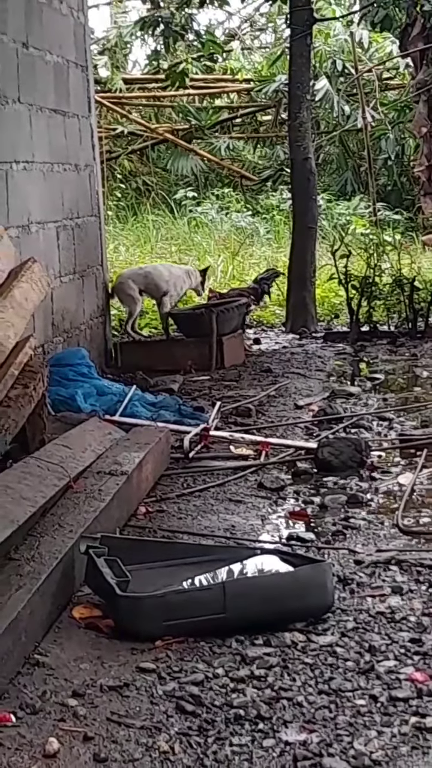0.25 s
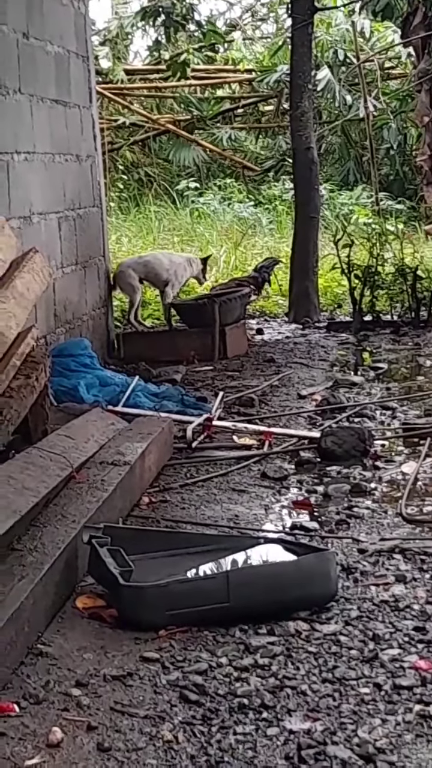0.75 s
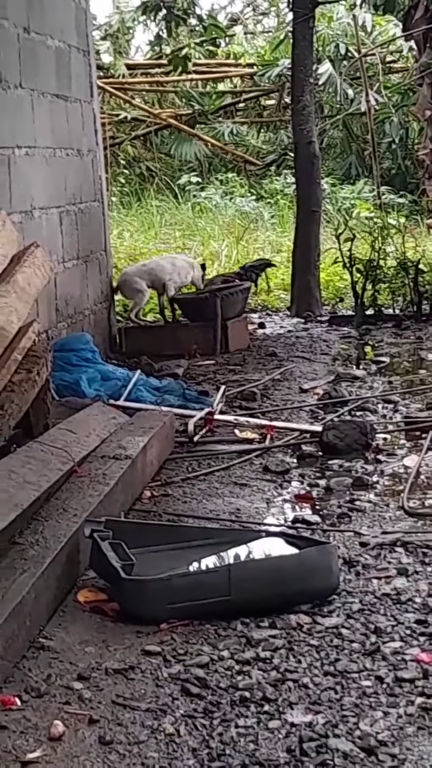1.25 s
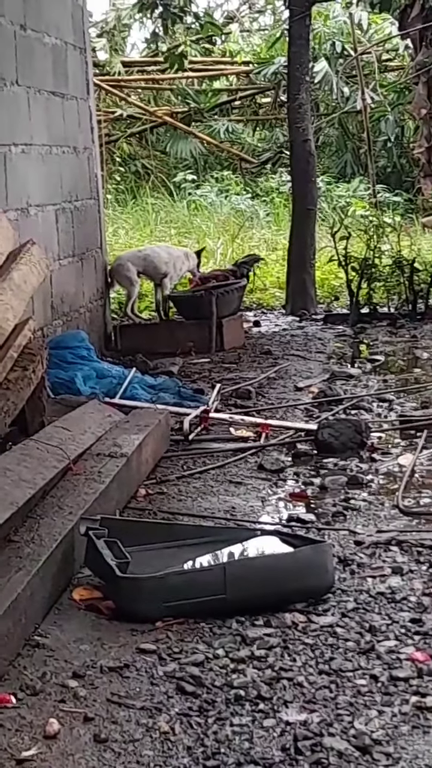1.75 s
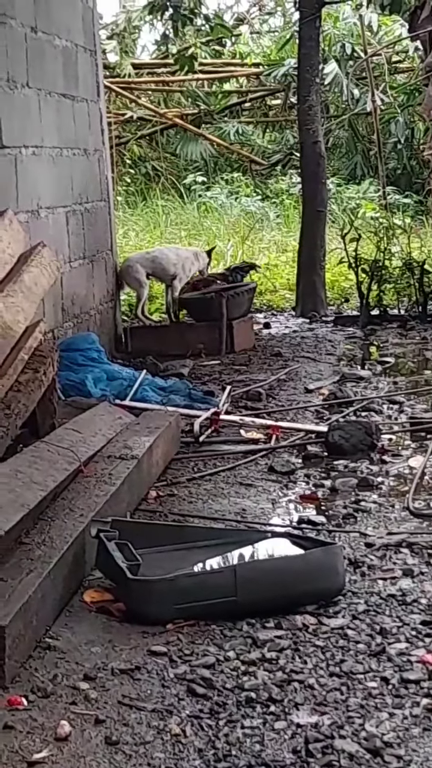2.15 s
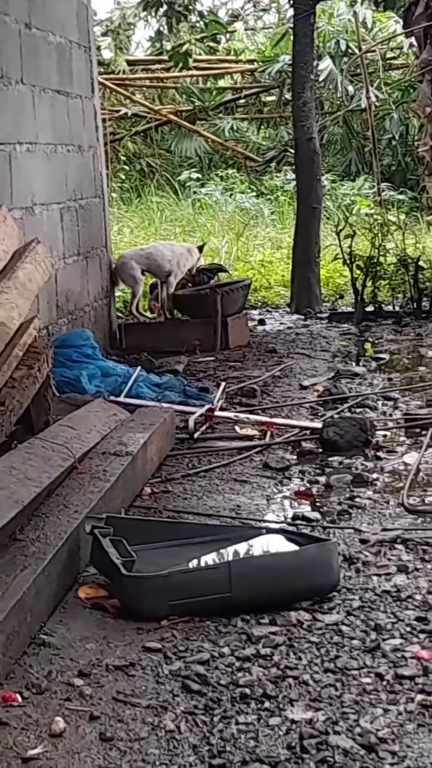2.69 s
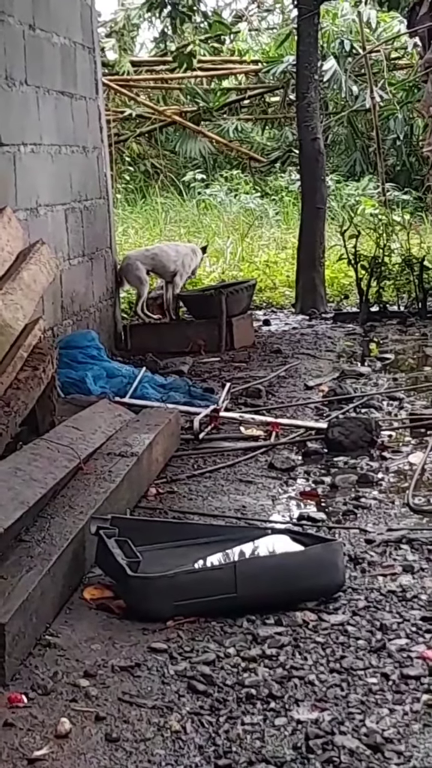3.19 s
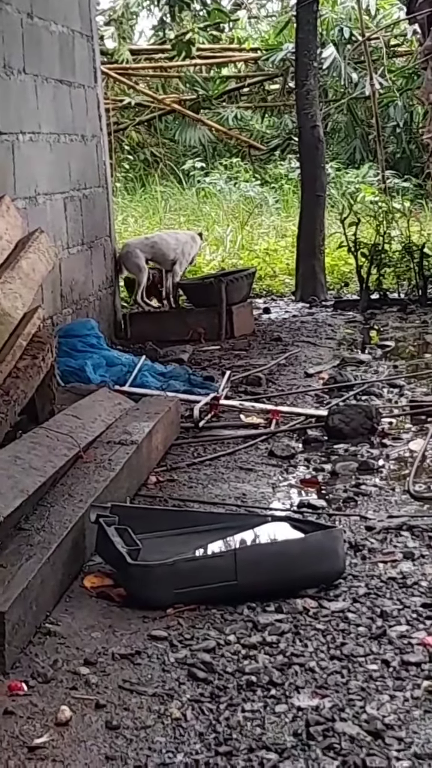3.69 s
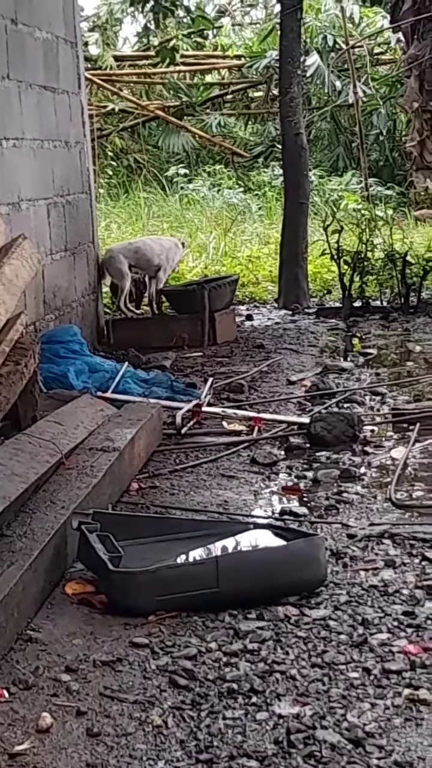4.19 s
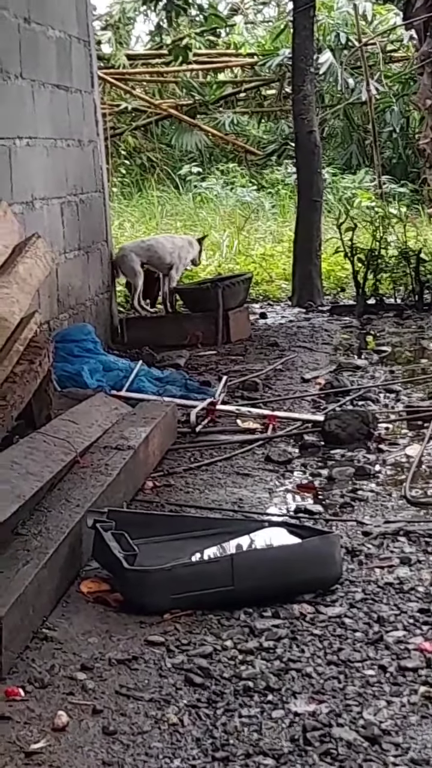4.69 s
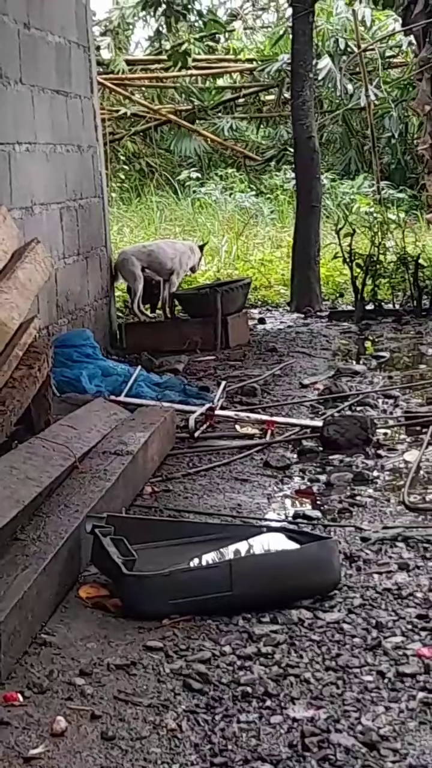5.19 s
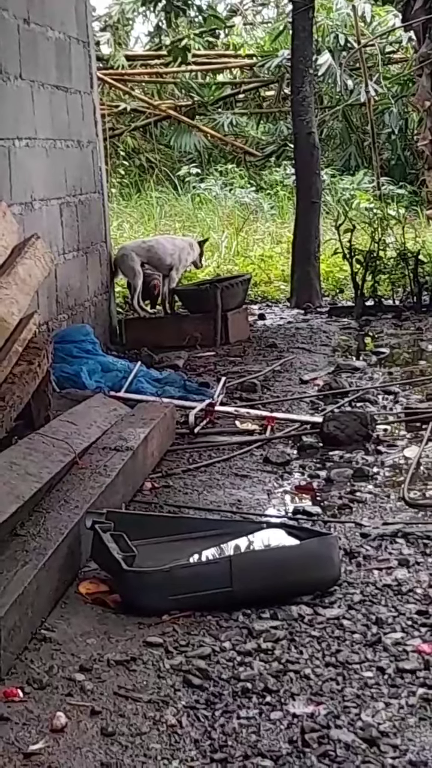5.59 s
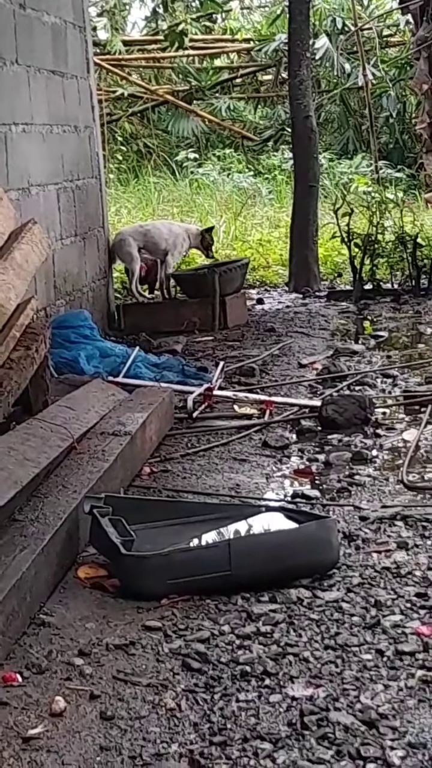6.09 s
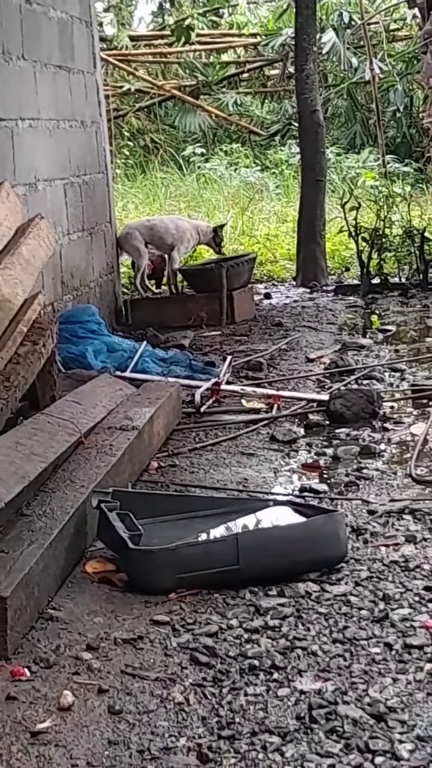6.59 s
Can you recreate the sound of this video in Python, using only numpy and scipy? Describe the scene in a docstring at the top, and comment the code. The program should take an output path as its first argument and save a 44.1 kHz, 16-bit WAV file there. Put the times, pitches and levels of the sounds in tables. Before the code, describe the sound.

A handheld microphone a few metres off catches a dog guarding its food: two sharp echoing barks, three long throaty growls, one gruff woof and a barely audible final yip. Buzzy chirps, thin chips and falling whistles come from bushes nearby, with more birds farther away. A dove repeats a quick fluttery coo, water ticks on the ground, and a far low drone swells softly beneath the hiss.

```python
"""Small dog guarding its food in a wet yard

Beside a block wall the dog gives two sharp barks, a gruff woof, three long growls and a faint yip:
rough vocal folds drive gliding throat and mouth resonances, and echoes and a diffuse tail answer.
Small birds chirp and peep and a dove coos its phrase three times, all gliding sines; a few drips tick in noise.
Filtered noise makes the far low drone, the air of the yard and the hiss of the microphone."""
import sys
import numpy as np
from scipy import signal
from scipy.fft import rfft, irfft, next_fast_len
from scipy.io import wavfile
from scipy.ndimage import uniform_filter1d

SR = 44100
rng = np.random.default_rng(int(sys.argv[2]) if len(sys.argv) > 2 else 0)


def store_wav(level_fs):
    """Save 16-bit WAV to argv[1]."""
    pcm = np.round(np.clip(np.atleast_2d(level_fs), -1, 1) * 32767)
    wavfile.write(sys.argv[1], SR, pcm.T.astype(np.int16))


N = 302073

# likeness of left and right in diffuse sound: pitch_hz, likeness (0 unrelated, 1 identical)
STEREO_LIKENESS = [(30, .85), (150, .95), (450, .92), (750, .85), (1000, .25), (3000, 0)]


def amp(db):
    """Turns decibels into a linear gain."""
    return 10 ** (np.asarray(db) / 20)


def evened(x):
    """Scales to rms 1."""
    return x / np.sqrt(np.mean(x ** 2) + 1e-20)


def steadied(x, size):
    """Holds the rms near 1 over stretches of size samples."""
    return x / np.sqrt(abs(uniform_filter1d(x ** 2, size)) + 1e-12)


def read(points, hz):
    """Reads a table on a log-frequency axis."""
    table_hz, value = np.transpose(points)
    return np.interp(np.log(hz + 1), np.log(table_hz + 1), value)


def follow(rows, t):
    """Gives every column of a curve table at the times t."""
    s, *columns = np.transpose(rows)
    return [np.interp(t, s, c) for c in columns]


def ramp(x, span):
    """Rises from 0 to 1 as x goes from 0 to span."""
    return np.clip(x / span, 0, 1)


def add(mix, start_s, sound):
    """Mixes a sound in at its start time, cut off where the mix ends."""
    part = mix[max(round(start_s * SR), 0):][:len(sound)]
    part += sound[:len(part)]


def tone(hz):
    """A sine that follows the pitch curve hz."""
    return np.sin(2 * np.pi * np.cumsum(hz) / SR)


def colour(x, points):
    """Filters by a table of pitch_hz, gain_db."""
    size = next_fast_len(x.shape[-1] + 4096)
    gain = amp(read(points, np.fft.rfftfreq(size, 1 / SR)))
    return irfft(rfft(x, size) * gain, size)[..., :x.shape[-1]]


def wander(size, rate_hz):
    """Smooth random drift of rms 1, with changes up to about rate_hz."""
    span = 2 ** 19 if size > 2 ** 17 else 2 ** 17
    hz = np.fft.rfftfreq(span, 1 / SR)
    return evened(irfft(rfft(rng.standard_normal(span)) / (1 + (hz / rate_hz) ** 4)))[:size]


def resonate(x, hz, width):
    """A resonance of gain 1, width in Hz, that follows the curve hz."""
    turn = np.exp(2j * np.pi * np.cumsum(hz * np.ones(len(x))) / SR)
    r = np.exp(-np.pi * width / SR)
    # shift the resonance down to zero, smooth there, and shift back
    return 2 * (turn * signal.lfilter([1 - r], [1, -r], x / turn)).real


def folds(hz, rough, jitter, jitter_hz, shimmer_db, hoarse, count):
    """Vocal folds: soft-edged pulses of uneven spacing and strength, with a puff of turbulence in each cycle."""
    size, rough = len(hz), np.clip(rough, 0, 1)
    turns = np.cumsum(hz * (1 + jitter * rough * wander(size, jitter_hz))) / SR
    harmonics = (np.cos(2 * np.pi * k * turns + k * k / count) for k in range(1, count + 1))
    pulses = sum(harmonics) * np.sqrt(4 * hz / SR)
    puffs = evened((.5 + np.exp(-(turns % 1) / .3)) * rng.standard_normal(size))
    shimmer = amp(shimmer_db * rough * wander(size, 100))
    return ((1 - rough) * pulses + hoarse * rough * puffs) * shimmer


def yard(x, wet_db, wall_db, left_db):
    """Direct sound, echoes from wall and ground, and a diffuse tail that each band loses at its own speed."""
    # decay of the tail: pitch_hz, t60_s
    decay = [(150, 0.89), (500, 0.37), (900, 0.36), (1250, 0.77), (1600, 0.66), (2200, 0.82), (3000, 0.63),
             (6000, 0.63), (12000, 0.071)]
    # early echoes: left_delay_s, right_delay_s, level_db before wall_db is added
    echoes = [(.0094, 0.0095, -7.5), (.0172, 0.021, -3.5), (.027, 0.021, -22.5), (0.06, 0.038, -8)]
    # sparse random reflections
    taps = rng.choice([-1., 1.], (2, SR)) * (rng.random((2, SR)) < 1 / 10)
    hz, t, bands = signal.stft(taps, SR, nperseg=256)
    same = np.clip(read(STEREO_LIKENESS, hz), -1, 1)[:, None]
    bands[1] = same * bands[0] + np.sqrt(1 - same ** 2) * bands[1]
    fade = amp(-60 * t / read(decay, hz)[:, None])
    build_up = 1 - np.exp(-t / 0.0039)
    tail = signal.istft(bands * fade * build_up, SR, nperseg=256)[1]
    response = amp(wet_db) * tail / np.linalg.norm(tail[0])
    response[:, 0] += 1  # direct sound
    for left_s, right_s, db in echoes:
        response[[0, 1], [round(left_s * SR), round(right_s * SR)]] += amp(db + wall_db)
    balance = amp([[left_db / 2], [-left_db / 2]])
    return signal.fftconvolve(x[None], response, axes=1)[:, :len(x)] * balance


def buzz(length, start_hz, end_hz):
    """A gliding note; a fast flutter of the pitch makes it buzz."""
    t = np.arange(0, length, 1 / SR)
    flutter = np.sin(2 * np.pi * (rng.uniform(70, 130) * t + rng.random()))
    hz = start_hz + (end_hz - start_hz) * t / length + 260 * flutter
    return evened(tone(hz) * (1 + 0.14 * flutter) * signal.windows.tukey(len(t), .5))


def whistle(length, start_hz, end_hz):
    """A clear gliding note with a slight quaver."""
    u = np.arange(0, length, 1 / SR) / length
    quaver = np.interp(u, np.linspace(0, 1, 24), rng.standard_normal(24))
    hz = start_hz + (end_hz - start_hz) * u + 70 * quaver
    return evened(tone(hz) * signal.windows.tukey(len(u), .4))


def background():
    """Noise for outdoor air, alike in both ears in the bass; a narrow noise band for the drone; and mic hiss."""
    # outdoor air, relative spectrum: pitch_hz, density_db (dB per Hz)
    air_colour = [(20, -33), (33, -23), (48, -5), (68, 0), (100, -3), (140, -8), (200, -21), (300, -21),
                  (500, -31), (1000, -37.5), (2000, -40), (4000, -30), (7000, -28)]
    # microphone hiss, relative spectrum: pitch_hz, density_db (dB per Hz)
    hiss_colour = [(4120, -14.5), (7000, -9), (7630, -7.5), (8050, -15), (8460, -18), (9860, 3.5),
                   (10500, 9), (11100, 3.5), (12200, -27), (12900, -46.5), (14500, -37.5), (15500, -37.5)]
    # swell of the drone: time_s, level_db before its trim
    drone_swell = [(0, -48.5), (1.5, -51.5), (2.7, -47), (3.5, -60), (4.9, -69.5), (5.65, -44), (5.95, -60),
                   (6.85, -75)]
    air_db, hiss_db, drone_trim_db = -57.5, -53.5, -8
    balance = amp([[-.6], [.6]])  # leans right

    a, b = rng.standard_normal((2, N))
    same = np.clip(read(STEREO_LIKENESS, np.fft.rfftfreq(N, 1 / SR)), -1, 1)
    right = irfft(same * rfft(a) + np.sqrt(1 - same ** 2) * rfft(b), N)
    air = amp(air_db + wander(N, 1.9)) * evened(colour(np.array([a, right]), air_colour)) * balance

    hum = resonate(resonate(rng.standard_normal(N), 93, 12), 93, 24)
    drone_db = follow(drone_swell, np.arange(N) / SR)[0] + drone_trim_db
    drone = amp(drone_db) * steadied(hum, size=14000)

    hiss = amp(hiss_db) * evened(colour(rng.standard_normal((2, N)), hiss_colour)) * balance
    return air + drone + hiss


def far_flock(count=180):
    """More birds further off: short falling peeps at random moments, mostly heard as echo."""
    # swell of the far peeping: time_s, level_db
    flock_swell = [(0, -70), (1.8, -77), (3.2, -60), (4.3, -64), (5.2, -61.5), (6, -65), (6.85, -62)]
    out = np.zeros(N)
    for when, pitch, span, fall in rng.random((count, 4)):
        u = np.arange(0, 1, 1 / (SR * (.04 + .07 * span)))
        hz = (3800 + 2200 * pitch) * (1 - (0.03 + 0.32 * fall) * u)
        add(out, when * N / SR, tone(hz) * np.sin(np.pi * u))
    level = amp(follow(flock_swell, np.arange(N) / SR)[0])
    return level * evened(yard(out, wet_db=3.5, wall_db=-11.5, left_db=-2.5))


def barks():
    """A hard, harsh burst: the mouth resonance rises as the jaw opens and sinks with the pitch as it shuts."""
    # the first bark is already under way, the last is a faint yip: start_s, length_s, effort_db, top_pitch_hz,
    # widest_mouth_hz, bite_db (level of the upper voice), roughness (0-1, before the end adds more)
    bark_rows = [(-.083, 0.17, -21, 315, 932, -12.5, 0.25), (1.261, .17, -18.5, 343.3, 1048, -16.5, .27),
                 (6.474, 0.11, -65.5, 314.2, 760, -19, 0.65)]
    # colour of the throat: pitch_hz, gain_db
    throat = [(150, -22), (400, -17), (560, -17.5), (740, -0.5), (1100, -3), (1330, -9), (1570, 5.5),
              (1750, 3), (2200, -6), (2650, -4), (3030, 2.5), (3500, -5), (4400, -8.5), (5500, -13.5),
              (9000, -22.5), (12000, -4), (15000, -27.5)]
    attack_s, attack_db = .021, 25.5  # the voice swells by this much
    hold, swell_db, release_db = .5, 6, 25.5  # share of the length; growth up to there; fade after it
    jaw_open_at = .2  # share of the length at which pitch and mouth peak
    pitch_start, pitch_end, pitch_lag = .84, .5, 1.2  # shares of the top pitch; late fall, as a power of time
    mouth_start, mouth_end, mouth_lag = .72, .48, 1.37  # shares of the widest resonance; the jaw shuts late
    bite_rise_s, bite_rise_db = .038, 23  # the upper voice comes in after the core
    end_rough = .35  # extra roughness as the voice gives out

    out = np.zeros(SR + N)  # begins one second early
    for start, length, peak_db, top_hz, widest_hz, bite_db, roughness in bark_rows:
        t = np.arange(0, length, 1 / SR)
        u = t / length
        unopened = 1 - ramp(u, jaw_open_at)
        shut = ramp(u - jaw_open_at, 1 - jaw_open_at)
        release = ramp(u - hold, 1 - hold)
        hz = top_hz * pitch_start ** unopened * pitch_end ** (shut ** pitch_lag)
        mouth_hz = widest_hz * mouth_start ** unopened * mouth_end ** (shut ** mouth_lag)
        effort_db = peak_db - attack_db * (1 - ramp(t, attack_s))
        effort_db = effort_db - swell_db * (1 - ramp(u, hold)) - release_db * release
        upper_db = bite_db - bite_rise_db * (1 - ramp(t, bite_rise_s))
        rough = roughness + end_rough * release ** 2
        source = folds(hz, rough, jitter=.06, jitter_hz=150, shimmer_db=6, hoarse=.85, count=18)
        drive = colour(source, throat)
        # two sharp throat resonances ring in the upper voice
        upper = drive + .7 * resonate(drive, 1555, 70) + .5 * resonate(drive, 3070, 140)
        core = resonate(resonate(drive, mouth_hz, 280), mouth_hz, 860)
        voice = steadied(core + amp(upper_db) * upper, size=400)
        add(out, 1 + start, amp(effort_db) * voice * signal.windows.tukey(len(t), .1))
    return yard(out, wet_db=-4.5, wall_db=0, left_db=-2.8)[:, SR:]


def small_birds(buzzy_db=-5, peeps_db=-10, slurs_db=-8, slurs_wet_db=-1):
    """Five kinds of gliding call in the bushes; the slurred whistler sits nearer than the rest."""
    # every level_db here stands before the trim of its group
    # runs of even buzzy chirps: start_s, spacing_s, pitch_hz, level_db
    chirp_runs = [(.49, .222, 4720, -67), (2.43, 0.26, 5040, -58.5), (4.915, .229, 4800, -66.5)]
    # size of each run: chirps (count)
    chirp_counts = [4, 4, 7]
    # sharp falling chips: start_s, level_db
    chip_rows = [(.294, -56), (0.756, -52), (3.456, -55), (3.749, -54.5), (4.147, -54.5), (6.686, -62.5)]
    # thin rising notes: start_s, level_db
    rise_rows = [(0.711, -66), (1.572, -63), (2.969, -59.5), (3.68, -61.5), (4.09, -64.5), (4.49, -57.5),
                 (6.461, -62)]
    # low falling peeps: start_s, level_db
    peep_rows = [(1.089, -66.5), (1.204, -61.5), (1.908, -61.5), (2.245, -62), (2.491, -59.5),
                 (6.057, -59.5), (6.32, -58.5), (6.542, -60.5), (6.758, -59)]
    # slurred whistles, most of them falling: start_s, length_s, start_hz, end_hz, level_db
    slur_rows = [(2.051, 0.13, 4740, 4820, -59.5), (3.002, 0.11, 4430, 3830, -61),
                 (3.41, 0.047, 5010, 4890, -50.5), (3.56, 0.061, 3310, 2560, -61),
                 (4.003, 0.11, 4820, 2830, -58.5), (4.521, 0.025, 3124, 2270, -47),
                 (4.639, 0.18, 5320, 3700, -62.5), (5.139, 0.18, 4230, 2604, -57.5),
                 (5.837, 0.051, 3725, 2934, -58), (6.48, 0.17, 4230, 3880, -63.5)]

    buzzy, peeps, slurs = np.zeros((3, N))
    for (s, spacing, hz, db), count in zip(chirp_runs, chirp_counts):
        for k in range(count):
            add(buzzy, s + k * spacing, amp(db) * buzz(length=.11, start_hz=hz, end_hz=.93 * hz))
    for s, db in chip_rows:
        add(buzzy, s, amp(db) * buzz(length=.056, start_hz=4800, end_hz=4010))
    for s, db in rise_rows:
        add(buzzy, s, amp(db) * buzz(length=.036, start_hz=5320, end_hz=7100))
    for s, db in peep_rows:
        add(peeps, s, amp(db) * whistle(length=.105, start_hz=3270, end_hz=2104))
    for s, length, start_hz, end_hz, db in slur_rows:
        add(slurs, s, amp(db) * whistle(length, start_hz, end_hz))
    peeps = colour(peeps, [(2000, -4), (2700, 2), (3500, -0.5)])  # strongest midway, weakest at its low end
    far = yard(amp(buzzy_db) * buzzy + amp(peeps_db) * peeps, wet_db=4, wall_db=0, left_db=-3)
    near = yard(amp(slurs_db) * slurs, wet_db=slurs_wet_db, wall_db=-8, left_db=-1.5)
    return far + near


def growls(chest_db=-3.5, leak_db=-30):
    """Rough folds behind a nearly shut mouth; a surge lifts effort, pitch, mouth and roughness together."""
    # one curve a growl, before the surges: time_s, effort_db, pitch_hz, mouth_hz
    growl_curves = [
        [(.35, -53, 199.3, 636.6), (.52, -51.5, 202, 563), (.85, -52, 208.8, 510), (1.29, -52.5, 196.1, 446)],
        [(1.74, -52.5, 204, 805), (1.88, -49.5, 203.6, 762), (2.07, -52.5, 202.9, 560),
         (2.3, -55.5, 181.5, 540), (2.52, -56, 175.3, 548.4), (2.72, -54, 187.3, 446), (3, -50.5, 214.3, 439),
         (3.53, -52.5, 210.1, 474), (3.64, -54, 161.5, 401.5)],
        [(4.45, -54, 205.3, 517), (4.66, -53, 179.5, 538), (4.78, -55.5, 163.6, 488), (5.25, -52, 185.7, 530),
         (5.52, -54, 179.8, 540), (5.7, -50, 183.6, 541), (5.92, -54.5, 166.6, 472), (6.16, -60.5, 160.6, 340)],
    ]
    # colour of the throat: pitch_hz, gain_db
    throat = [(60, -13), (120, 8), (175, -5), (215, -3), (290, 20.5), (400, 11.5), (460, 5.5), (535, 5),
              (650, -4), (730, -7.5), (880, -4), (1050, -15.5), (1350, -16), (1900, -20), (3000, 7.5),
              (6000, -48.5)]
    # the dog pushes harder for a moment, in the third growl as a woof: peak_s, rise_s, fall_s, extra_effort_db
    surges = [(1.284, 0.05, .04, 18), (1.972, 0.036, 0.031, 3), (4.53, .044, .056, 16.5)]
    pitch_hz_per_db, mouth_hz_per_db, rough_per_db = 4.6, 13, .013  # what each dB of surge adds
    # roughness at the rest pitch and mouth, and its gain per octave of wider mouth and of lower pitch
    rest_rough, rough_per_open, rough_per_low = .44, .2, .25
    rest_hz, rest_mouth_hz = 200, 500
    attack_s, release_s = .048, .074

    out = np.zeros(N)
    for rows in growl_curves:
        t = np.arange(rows[0][0], rows[-1][0], 1 / SR)
        effort_db, hz, mouth_hz = follow(rows, t)
        surge_db = 0
        for s, rise, fall, db in surges:
            surge_db = surge_db + db * np.exp(-((t - s) / np.where(t < s, rise, fall)) ** 2)
        rough = rest_rough + rough_per_open * np.log2(mouth_hz / rest_mouth_hz)
        rough = rough + rough_per_low * np.log2(rest_hz / hz) + rough_per_db * surge_db
        effort_db = effort_db + surge_db
        hz = hz + pitch_hz_per_db * surge_db
        mouth_hz = mouth_hz + mouth_hz_per_db * surge_db
        source = folds(hz, rough, jitter=.11, jitter_hz=80, shimmer_db=4, hoarse=.5, count=14)
        drive = colour(source, throat)
        push_db = effort_db + 50.5  # a harder push brightens the voice
        # the second throat resonance
        upper = resonate(resonate(source, 1276, 260), 1100, 380) + .06 * drive
        mouth = resonate(resonate(drive, mouth_hz, 270), mouth_hz, 460)
        mouth = mouth + amp(leak_db + 1.2 * push_db) * upper
        chest = resonate(resonate(source, hz, 150), hz, 200)  # neck and chest radiate the fundamental
        chest_gain = amp(chest_db - np.maximum(push_db, 0))
        voice = steadied(mouth, size=2600) + chest_gain * steadied(chest, size=4000)
        swell = ramp(t - t[0], attack_s) * ramp(t[-1] - t, release_s)
        add(out, t[0], amp(effort_db) * swell * voice)
    return yard(out, wet_db=-13, wall_db=-7, left_db=.6)


def dove():
    """Each coo is a near sine that scoops up to its pitch and glides on, with a quaver."""
    # the notes of one phrase: delay_s, length_s, top_hz, end_hz, level_db before the phrase's own
    coo_notes = [(0, 0.06, 915, 961.7, -60.5), (0.019, .16, 1169, 1073, -49),
                 (0.182, 0.038, 1085, 988, -55), (0.233, 0.0365, 946, 1086, -55),
                 (0.305, .032, 940, 890, -61), (.397, 0.043, 918, 1047, -56.5),
                 (0.491, 0.141, 1082, 994, -60.5)]
    # when the phrase is sung: start_s, added_level_db
    phrases = [(1.319, 1.5), (3.267, 3), (5.536, 2.5)]
    scoop, scoop_s = .16, .009  # starts this share under its pitch; time constant of the rise
    quaver, fade_s = .018, .018  # unsteadiness as a share of the pitch; fade at both ends
    out = np.zeros(N)
    for s, phrase_db in phrases:
        for delay, length, top_hz, end_hz, db in coo_notes:
            t = np.arange(0, length, 1 / SR)
            glide_hz = top_hz + (end_hz - top_hz) * t / length
            hz = glide_hz * (1 - scoop * np.exp(-t / scoop_s)) * (1 + quaver * wander(len(t), 90))
            swell = ramp(t, fade_s) * ramp(length - t, fade_s)
            add(out, s + delay, amp(db + phrase_db) * evened(swell * tone(hz)))
    return yard(out, wet_db=-13, wall_db=-10, left_db=1.5)


def drips():
    """Short ticks of water on wet ground: coloured noise that dies away fast."""
    # start_s, level_db before the decay
    drip_rows = [(2.417, -46.5), (3.415, -39.5), (3.77, -49.5), (4.009, -51.5), (5.35, -61)]
    # colour of a tick: pitch_hz, gain_db
    tick_colour = [(500, 7), (1200, -7.5), (2500, -9), (6000, -11), (11000, -5.5), (15000, -13.5)]
    out, t = np.zeros(N), np.arange(2048) / SR
    for s, db in drip_rows:
        tick = evened(colour(rng.standard_normal(len(t)), tick_colour))
        add(out, s, amp(db) * tick * np.exp(-t / 0.0047))
    return yard(out, wet_db=-4, wall_db=-2, left_db=-1)


def scene():
    """The whole yard in stereo."""
    return background() + far_flock() + barks() + small_birds() + growls() + dove() + drips()


def record(dry):
    """The microphone dips in the treble and stays a little dull above; then the band limit."""
    heard = colour(dry, [(7600, 0), (8500, -16.0), (9500, -6)])
    low_pass = signal.firwin(511, 15450, window=("kaiser", 9), fs=SR)
    return signal.oaconvolve(heard, low_pass[None], "same")


dry = scene()
out = record(dry)
store_wav(out)
```